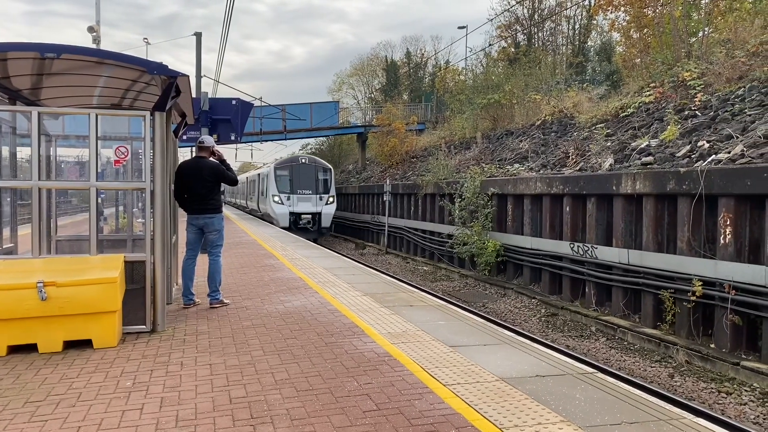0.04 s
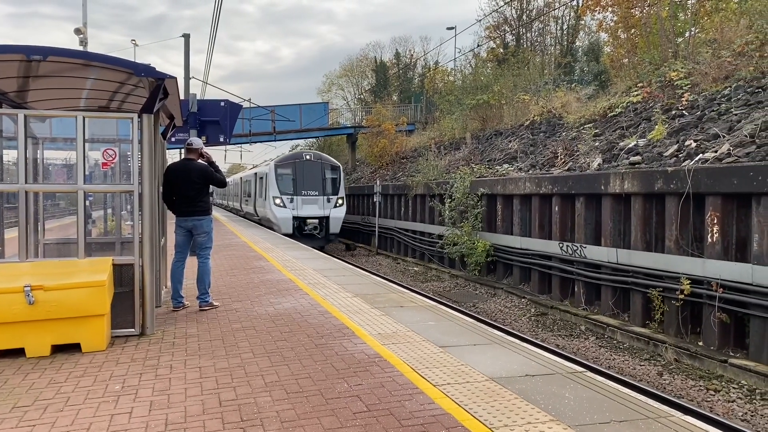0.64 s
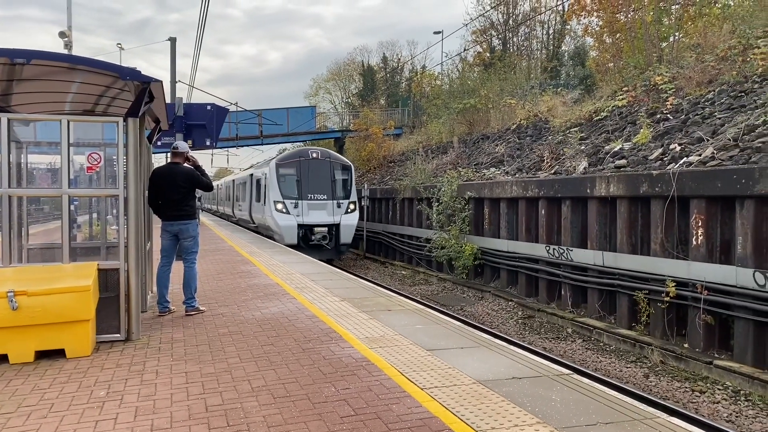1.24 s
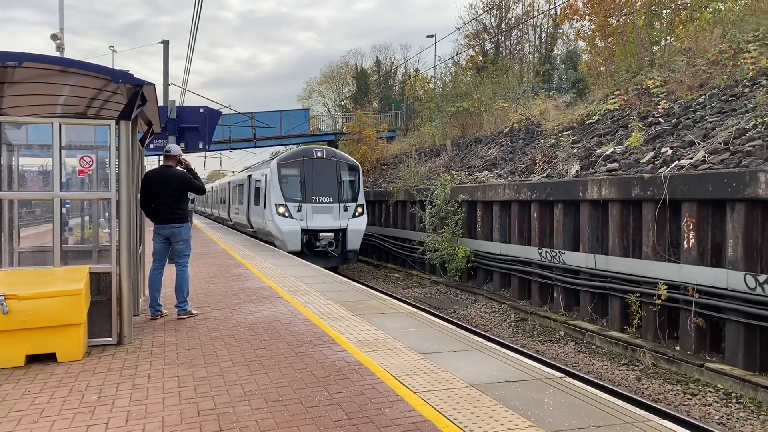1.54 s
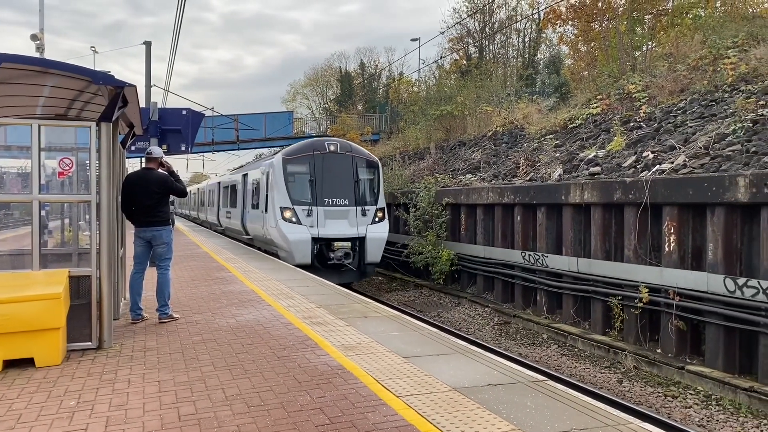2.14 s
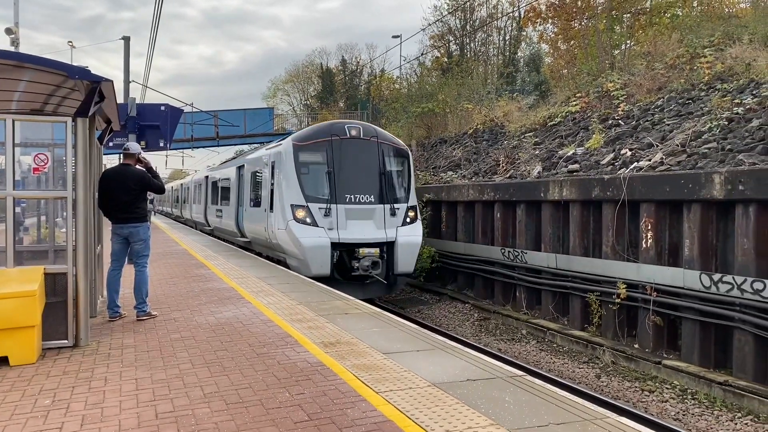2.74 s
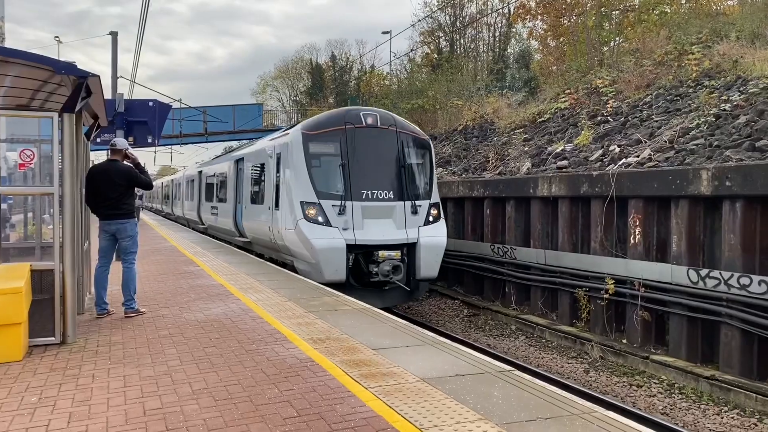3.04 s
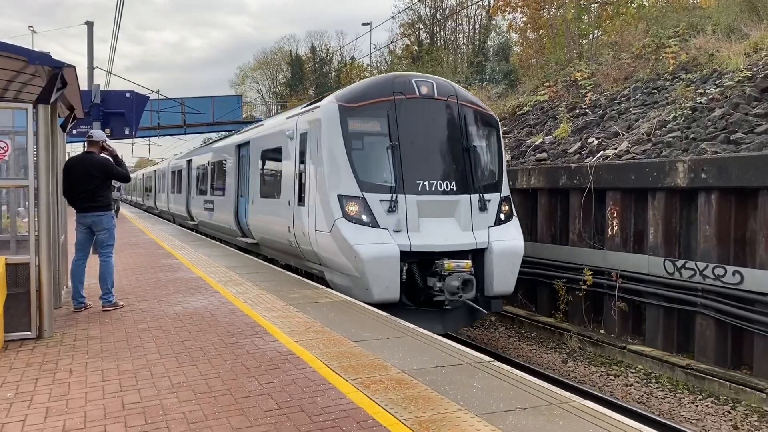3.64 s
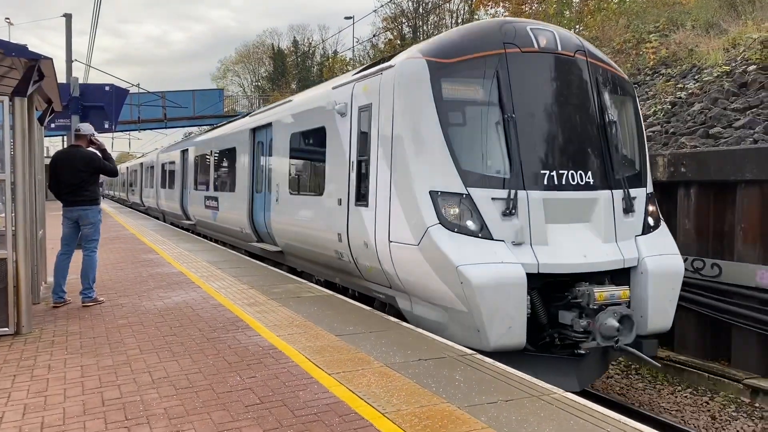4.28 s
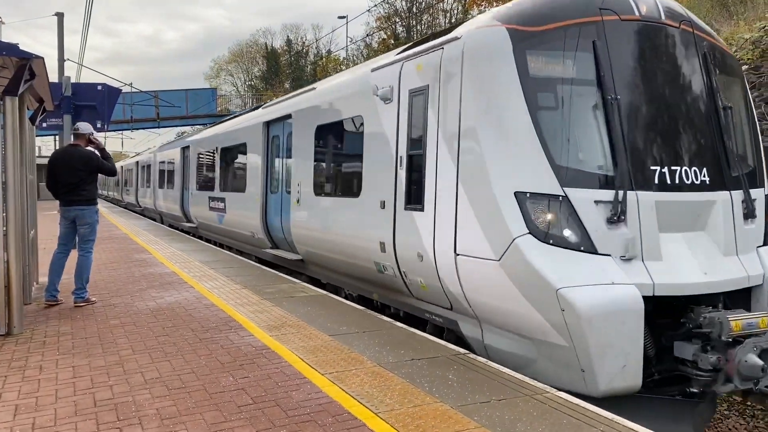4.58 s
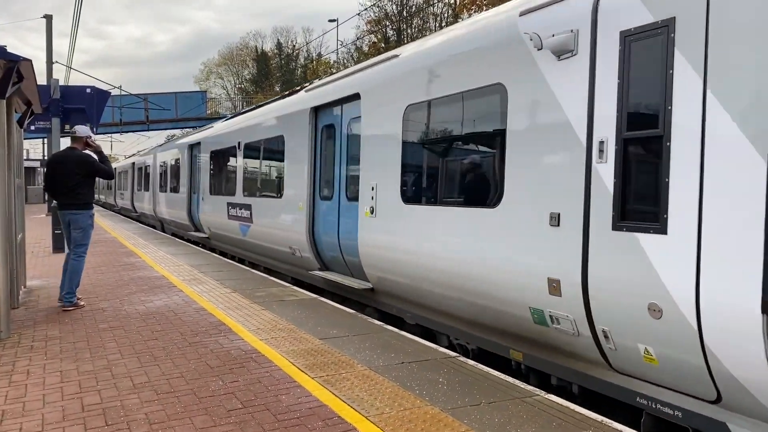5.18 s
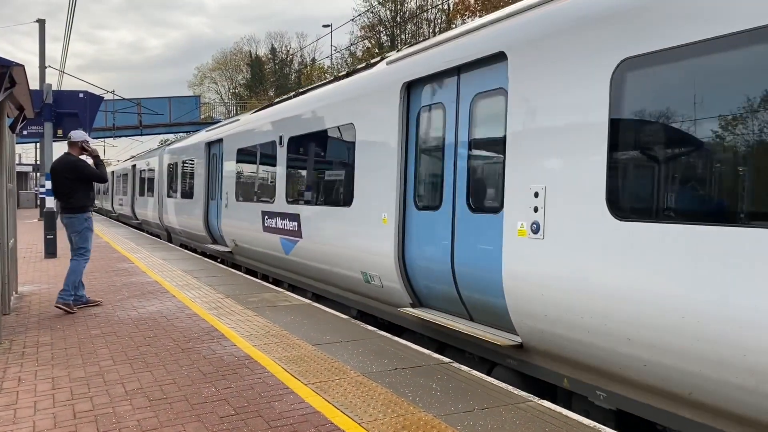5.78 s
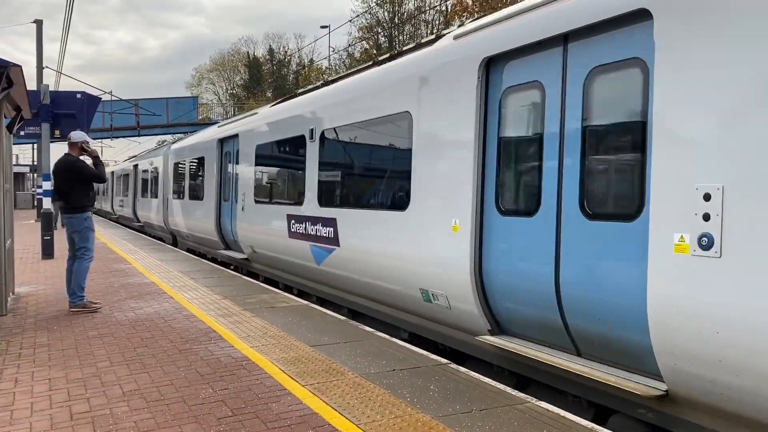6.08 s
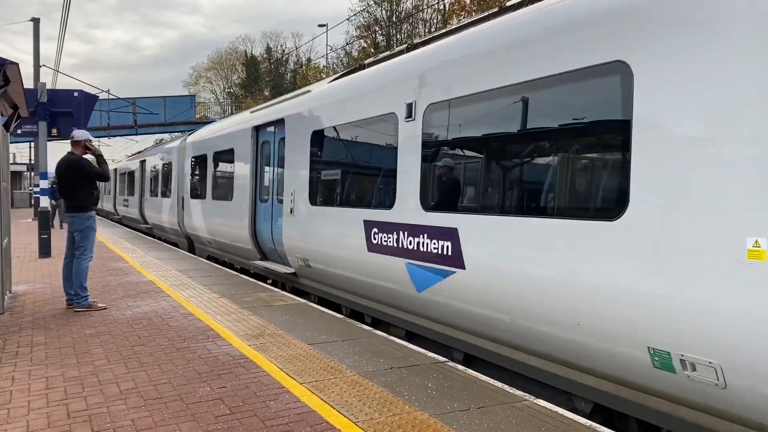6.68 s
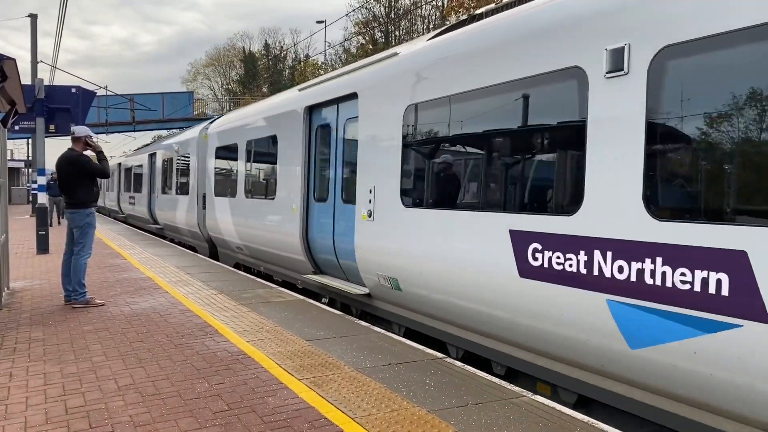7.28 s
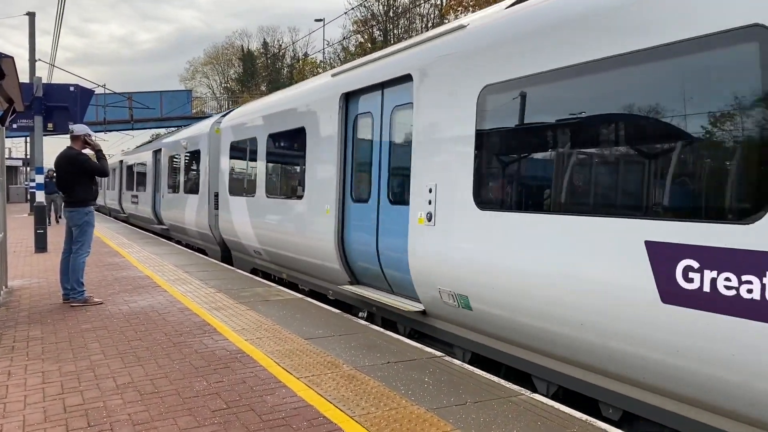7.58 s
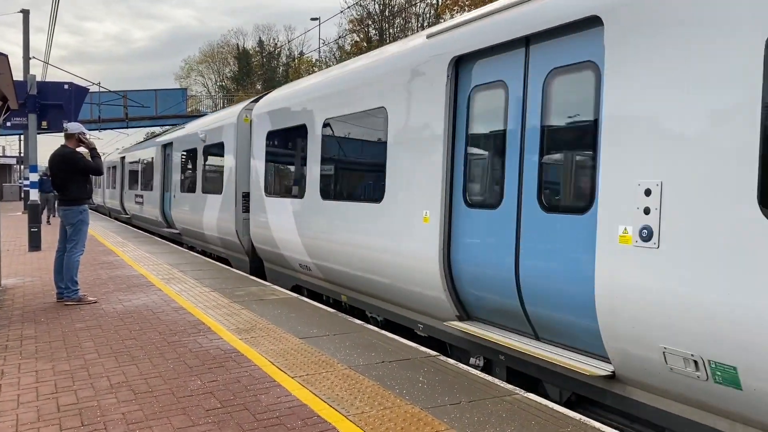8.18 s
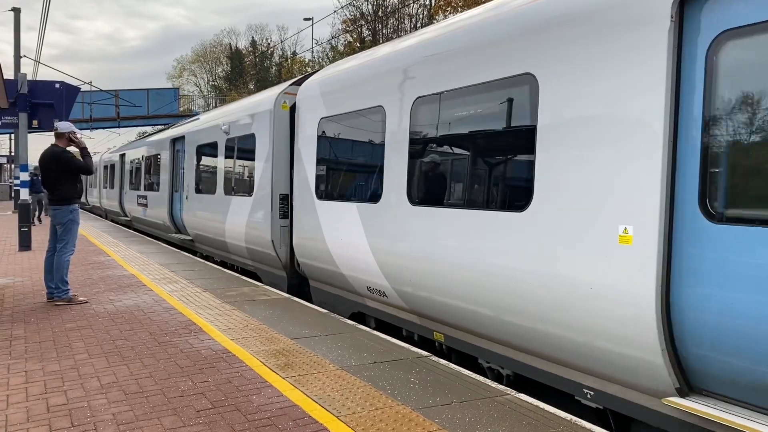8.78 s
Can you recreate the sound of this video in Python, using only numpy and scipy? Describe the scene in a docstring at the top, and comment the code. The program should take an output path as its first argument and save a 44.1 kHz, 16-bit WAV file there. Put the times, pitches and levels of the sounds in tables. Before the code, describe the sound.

An electric train brakes into a station, its high motor squeal and wheel rumble swelling as it passes close by.

```python
"""At a platform in a walled cutting, an electric train brakes; its first motor bogie passes at 6.2 s.
The inverters make the motors squeal at harmonics of the switching rate, with phase-modulation
sidebands that close in as the train slows. The gear whine falls, thin whistles drift, shafts and a fan
drone. Rough wheels excite ground, car bodies and rails into rumble, hiss and booms. A small knock sounds,
and later a brake valve puffs twice. The walls scatter the squeal, the gear whine and the whistles."""
import sys
import numpy as np
from scipy import signal
from scipy.fft import rfft, irfft, next_fast_len
from scipy.io import wavfile
from scipy.ndimage import uniform_filter1d, map_coordinates

SR = 44100
rng = np.random.default_rng(int(sys.argv[2]) if len(sys.argv) > 2 else 0)


def dump_mix(stems):
    """Bounce the given channels to the path in sys.argv[1] as a 16-bit WAV at rate SR."""
    frames = np.atleast_2d(stems).T  # one column per channel
    limited = np.clip(frames, -1, 1)  # hard clip at full scale
    pcm = np.round(limited * 32767).astype(np.int16)
    wavfile.write(sys.argv[1], SR, pcm)


N = 393603
T = np.arange(N) / SR
SOUND_M_PER_S, TOP_HZ = 343, 15400
PASSING_S, TRACK_M = 6.2, 3.5  # when the first bogie draws level, and how far from the microphone
SWITCH_HZ, FULL_DEPTH_MESH_HZ = 675, 1900
MESH_PER_METRE, MESH_PER_CURRENT, MESH_PER_SHAFT = 435, 62, 26.3  # mesh cycles per metre or per cycle

# gear mesh rate, proportional to the train's speed: (time [s], frequency [Hz])
MESH_RATE = [(0, 2497), (3.9, 1804), (6.2, 1539), (8.93, 1132)]
# motor bogies: (distance behind the first [m], relative level [dB])
MOTOR_BOGIES = [(0, -3), (13, 1), (19, 10.5)]
# reverberation of the walls: (frequency [Hz], time to decay by 60 dB [s])
WALL_DECAY = [(200, 0.35), (2500, 0.83), (8000, 0.98), (15000, 0.62)]
# wall reflections: (extra path per metre of approach [m/m], relative level [dB])
REFLECTIONS = [(0.55, -2), (1.15, -5), (1.9, -9)]
# squeal registers, hum to sizzle: (unscreened level at the passing [dB], growth with nearness [dB/dB],
# screening [dB], place of half screening [m], softness of the edge [m])
REGISTER_LEVELS = [(-33, 1.67, 21, -5.5, 4.9), (-22.5, 2, 22, -5, 6.46), (-43.5, 1.13, 26, -0.7, 9.4),
                   (-38.5, 2.07, 19, 0, 5.5), (-47.5, 2.5, 23.5, -1, 8.5), (-46, 2.5, 19, -1, 4.8)]
# partials of each register:
# (multiple of the switching rate, relative level [dB], modulation depth at FULL_DEPTH_MESH_HZ [rad])
HUM_PARTIALS = [(2, 0, 0.72)]
MAIN_PARTIALS = [(4, 0, 0.97)]
ODD_PARTIALS = [(3, -3, 2.1), (5, 2.5, 2.23), (7, -5, 2.7)]
RING_PARTIALS = [(6, 1.5, 1.53), (8, 0.5, 1.8), (9, -12.5, 3.6), (10, -25, 2.8), (12, -10.5, 1.6)]
FIZZ_PARTIALS = [(10, 3, 3), (11, -3.5, 3), (13, -61, 4.7), (14, -24, 2.1), (15, -7.5, 2.7), (16, 1, 2.6),
                 (17, -4.5, 4.5), (18, -3.5, 3)]
SIZZLE_PARTIALS = [(19, -14, 3), (20, -13, 2.8), (21, -1, 2.6), (22, 0, 3.1)]
# long swells of the hum, short throbs of the main tone: (time [s], extra level [dB], half length [s])
HUM_RISES = [(0.22, 5.5, 0.055), (1.07, 7.5, 0.072), (2.02, 2, 0.22), (3.17, 3.5, 0.088), (3.46, 3.5, 0.15),
             (3.87, 6.5, 0.043), (4.11, 5.5, 0.16), (4.68, 7, 0.028), (4.98, 7.5, 0.059), (5.28, 9.5, 0.13),
             (8.47, 9.5, 0.062)]
MAIN_THROBS = [(0.97, 4.5, 0.013), (1.04, 5, 0.018), (1.16, 5.5, 0.02), (1.29, 3, 0.024), (1.53, 4, 0.016),
               (1.8, 6, 0.013), (1.91, 5.5, 0.02), (1.97, 4, 0.013), (2.66, 5.5, 0.008), (2.72, 4, 0.022),
               (2.89, 6, 0.023), (2.93, 13, 0.0068), (3.185, 7.5, 0.015), (3.29, 4.5, 0.013),
               (3.41, 4.5, 0.021), (3.465, 6.5, 0.022), (3.555, 7, 0.011), (3.715, 9, 0.033),
               (3.795, 8, 0.02), (3.965, 8, 0.013), (4.07, 9, 0.015), (4.16, 8.5, 0.016),
               (4.215, 6.5, 0.023), (4.383, 5.5, 0.01), (4.443, 0, 0.0087), (4.59, 4, 0.0076),
               (4.7, 5, 0.016), (4.757, 5, 0.014), (4.83, 1, 0.011), (4.91, 8.5, 0.014), (4.967, 5.5, .016),
               (5.05, 2.5, .018), (5.223, 11, 0.0078), (5.323, 6.5, 0.0064), (5.417, 5, 0.0077),
               (5.507, 12.5, 0.0082), (5.58, -1, 0.024), (5.737, 9, 0.012), (5.83, 5, 0.011),
               (5.893, 12, 0.0057), (5.967, 8.5, 0.0097), (6.073, 10, 0.0062), (6.18, 11, 0.022),
               (6.323, 8, 0.022), (6.393, 12, 0.011), (6.46, 10, 0.017), (6.507, 8, 0.011),
               (6.637, 12, 0.015), (6.74, 6, 0.034), (6.82, 5, 0.026), (6.87, 8, 0.015),
               (6.935, 8.5, 0.024), (7.03, 6.5, 0.028), (7.073, 1.5, 0.011), (7.347, 6, 0.019),
               (7.445, 7.5, 0.031), (7.553, 6, 0.029), (7.727, 5, 0.014), (7.797, 6, 0.015),
               (7.96, 8.5, 0.0088), (8.05, 7, 0.018), (8.14, 9, 0.0085), (8.337, 1, 0.014),
               (8.44, 3.5, 0.013), (8.52, 2.5, 0.012), (8.65, 3, 0.015), (8.74, 1, .011),
               (8.807, -11, 0.014)]
# stereo balance of the squeal: (frequency [Hz], left minus right [dB])
SQUEAL_BALANCE = [(1350, -1), (2700, 1), (4000, 4), (5400, 6.5), (8000, 0), (15000, 0)]
# stereo phase of the squeal: (frequency [Hz], lag of the left [rad])
SQUEAL_PHASE = [(5600, 0), (7300, 0.73), (9400, 5), (11400, 6), (13500, 11), (15000, 10)]
# swells of the gear whine: (time [s], level [dB], half length [s])
GEAR_SWELLS = [(1.63, -50, 0.063), (1.912, -54, 0.1), (2.272, -54, 0.066), (3.1, -52.5, 0.13),
               (3.422, -52, 0.088), (3.69, -55, 0.11), (4.263, -50, 0.085), (5.152, -54, 0.11),
               (5.454, -49, 0.047)]
# three motor whistles, then a faint ringing, one table each: (time [s], frequency [Hz], level [dB])
THIN_WHISTLES = [
    [(2.8, 3260, -67), (3.5, 3060, -63), (4.3, 3150, -52), (5.5, 3090, -61), (6.3, 3040, -62),
     (7.2, 3100, -65)],
    [(5.6, 4380, -90), (6.6, 4380, -63), (7.9, 4330, -66), (8.93, 4260, -72)],
    [(6.6, 4240, -72), (7.5, 4210, -59), (8.2, 4230, -63), (8.93, 4320, -81.5)],
    [(0, 1168, -60), (2.5, 1162, -61), (4.8, 1140, -66), (6.2, 1147, -55)],
]
# shaft drone: (time [s], fundamental level [dB], octave level [dB])
SHAFT_LEVELS = [(0, -48, -58), (1.4, -45, -53), (2, -40.5, -42.5), (2.5, -45, -46), (3, -46, -49),
                (3.6, -42.5, -47), (4.3, -35, -44), (4.8, -39, -48), (5.5, -45, -49), (8.93, -54, -56)]
# rolling noise of ground, body, wheels, rails: (level at the passing [dB], growth with nearness [dB/dB])
ROLLING_LEVELS = [(-35, 0.45), (-32, 1.1), (-35.5, 1.35), (-47.5, 0.57)]
# spectra of those four and of the nearest wheel treads: (frequency [Hz], relative level [dB])
GROUND_SPECTRUM = [(15, -61), (24, -30), (32, -8), (45, -0.5), (65, 3.5), (88, 2.5), (130, -4),
                   (170, -12.5), (290, -96)]
BODY_SPECTRUM = [(70, -45), (115, -8.5), (150, -7), (185, 1.5), (240, 1), (285, -0.5), (325, -7),
                 (400, -14.5), (445, -10), (500, -23), (650, -93)]
WHEEL_SPECTRUM = [(200, -22), (350, -8.5), (480, -0.5), (650, -2), (900, -5.5), (1250, -11), (1600, -23),
                  (2500, -75)]
RAIL_SPECTRUM = [(900, -20), (1500, 0.5), (1950, 3), (2400, -2), (3000, -6.5), (4400, -9.5), (6000, -12),
                 (7400, -16), (10000, -27), (15500, -32)]
TREAD_SPECTRUM = [(250, -32), (430, 6), (750, 3.5), (1100, 3.5), (1400, 1), (2000, -10), (3000, -40)]
# rightward swing of the rolling noise: (time [s], bearing [right angles])
BEARING = [(3.5, 0.0077), (7, 0.89)]
# the platform edge shadows the wheels: (screening [dB], place of half screening [m], softness [m])
WHEEL_SHADOW = (11.2, -2, 6.6)
# the body rumbles harder as the first bogie goes by: (time [s], extra level [dB], half length [s])
BODY_RISE = (7.72, 4, 0.34)
# resonances of body and track, and one swell of the fan's tone near 284 Hz at about 4 s: (time [s], frequency
# [Hz], level [dB], half length [s])
RESONANCES = [(0.192, 78.7, -30, 0.015), (0.26, 53.4, -31, 0.024), (0.387, 42.5, -33, 0.022),
              (0.4, 200.4, -46.5, 0.33), (1.645, 62.4, -38.5, 0.11), (3.956, 283.8, -42.5, 0.36),
              (4.94, 246.7, -33.5, 0.21), (6.05, 96.6, -41.5, 0.29), (6.757, 270.8, -37.5, 0.28),
              (6.76, 74.6, -29, 0.036), (7.617, 65.5, -32.5, 0.067), (7.619, 204.7, -37, 0.22),
              (7.76, 168, -35.5, 0.099), (7.992, 174.6, -28.5, 0.049), (8.202, 42.2, -36, 0.068),
              (8.498, 44.8, -40, 0.11), (8.56, 70.8, -34, 0.13)]
# a small knock, then two puffs of brake air: (time [s], centre [Hz], level [dB], half length [s])
NOISE_BURSTS = [(2.286, 1730, -46, 0.03), (6.15, 5200, -42.5, 0.017), (6.167, 2000, -36.5, 0.018)]
# spectrum of a burst: (multiple of the centre frequency, relative level [dB])
BURST_SPECTRUM = [(0.25, -50), (0.68, -5), (1, 0), (1, -4), (2, -20), (5, -50)]
# the first bogie's axles pass the platform gap: (time [s], level [dB], half length [s])
AXLE_PASSES = [(6.647, -41, 0.56), (7.7, -46, 0.55)]


def amp(db):
    """Amplitude ratio of a level in decibels."""
    return 10 ** (np.asarray(db) / 20)


def unit(x):
    """Normalisation to rms 1."""
    return x / np.sqrt(np.mean(x ** 2) + 1e-20)


def along(points, hz):
    """Interpolation of (frequency, value) points on a logarithmic frequency axis."""
    knots_hz, values = np.transpose(points)
    return np.interp(np.log(hz + 1), np.log(knots_hz + 1), values)


def curves(rows):
    """Linear interpolation in time: one curve for each column after the first."""
    times, *columns = np.transpose(rows)
    return [np.interp(T, times, column) for column in columns]


def wobble(rate):
    """Smooth random modulation: a spline through `rate` Gaussian knots a second."""
    coarse = np.linspace(0, T[-1], N // 20)
    knots = rng.standard_normal(8192)
    return np.interp(T, coarse, map_coordinates(knots, [coarse * rate], mode="wrap"))


def bell(s, half):
    """Gaussian envelope of height 1 at time s, with standard deviation `half`."""
    return np.exp(-np.minimum(((T - s) / half) ** 2 / 2, 30))


def swells(rows):
    """Superposition of Gaussian envelopes, each with its own peak level."""
    return sum(amp(db) * bell(s, half) for s, db, half in rows)


def rises_db(rows):
    """Gaussian rises in level, which add in decibels."""
    return sum(db * bell(s, half) for s, db, half in rows)


def phase(hz):
    """Phase as the time integral of frequency."""
    return 2 * np.pi * np.cumsum(hz) / SR


def filtered(x, response):
    """Linear filtering: the spectrum times a frequency response."""
    size = next_fast_len(N + SR // 4, True)
    hz = np.fft.rfftfreq(size, 1 / SR)
    return irfft(rfft(x, size) * response(hz), size)[..., :N]


def whine(hz, db, blur_rad, blur_rate, waver_db):
    """A tone whose spectral line is broadened by random phase and amplitude modulation."""
    tone = np.sin(phase(hz) + blur_rad * wobble(blur_rate))
    return amp(db) * unit(tone * amp(waver_db * wobble(13)))


def rush(spectrum, coherence, lag_ms):
    """Partly coherent stereo noise of rms 1; sound from the right reaches the left later."""
    turn = np.arccos(coherence) / 2
    mid, side = rng.standard_normal((2, N)) * [[np.cos(turn)], [np.sin(turn)]]
    lag_s = np.array([[lag_ms / 1000], [0]])
    response = lambda hz: amp(along(spectrum, hz)) * np.exp(-2j * np.pi * hz * lag_s)
    return unit(filtered(np.array([mid + side, mid - side]), response))


def travel():
    """Distance as the integral of speed: metres by which the first bogie has passed the microphone."""
    metres = np.cumsum(curves(MESH_RATE)[0] / MESH_PER_METRE) / SR
    return metres - np.interp(PASSING_S, T, metres)


def bogie_paths():
    """Spherical spreading: each bogie's range and share, and their joint nearness (0 dB at the passing)."""
    place = travel()
    ranges = [np.hypot(place - behind, TRACK_M) for behind, _ in MOTOR_BOGIES]
    gains = np.array([amp(db) / r for (_, db), r in zip(MOTOR_BOGIES, ranges)])
    total = np.linalg.norm(gains, axis=0)
    near_db = 20 * np.log10(total / np.interp(PASSING_S, T, total))
    return ranges, gains / total, near_db


def screening(screen_db, edge_m, soft_m):
    """Acoustic shadow: decibels lost as the first bogie slips behind the platform edge."""
    return screen_db * (1 + np.tanh((travel() - edge_m) / soft_m)) / 2


def reflections(x):
    """Doppler shift: reflected paths lengthen as the train nears, adding copies of lower pitch."""
    place = travel()
    approach_m = (place - np.hypot(place, TRACK_M)) / 2
    lag = approach_m / SOUND_M_PER_S * SR
    copies = sum(amp(db) * map_coordinates(x, [np.arange(N) - extra * lag], mode="mirror")
                 for extra, db in REFLECTIONS)
    return (x + copies) / np.sqrt(1 + sum(amp(db) ** 2 for _, db in REFLECTIONS))


def cutting(x, wet_db):
    """Direct sound plus diffuse wall scatter, whose impulse response changes as the train moves."""
    hop = SR // 4
    window = np.sqrt(signal.get_window("hann", 2 * hop))
    padded = np.pad(reflections(x), (hop, 2 * hop))
    echo = np.zeros((2, N + 2 * SR))
    for start in range(0, N + hop, hop):
        hz, t, noise = signal.stft(rng.standard_normal((2, hop)), SR, nperseg=256)
        decay = amp(-60 * t / along(WALL_DECAY, hz)[:, None])
        decay /= np.linalg.norm(decay, axis=1, keepdims=True)
        tail = signal.istft(noise * decay, SR, nperseg=256)[1]
        tail /= np.linalg.norm(tail[0])
        part = signal.fftconvolve([padded[start:start + 2 * hop] * window], tail, axes=1)
        echo[:, start:start + part.shape[1]] += part
    return (x + amp(wet_db) * echo[:, hop:hop + N]) / np.hypot(1, amp(wet_db))


def evened(x, span_s, share):
    """Compression: division by the running rms evens out a share of a tone's random fading."""
    smooth = lambda v: uniform_filter1d(v, int(span_s * SR))
    power = np.abs(smooth(smooth(np.mean(x ** 2, axis=0)))) + 1e-6
    return unit(x / power ** (share / 2))


def inverter_tones(mesh_hz, ranges, shares):
    """Phase modulation: each bogie's motor current puts sidebands on the switching harmonics."""
    registers = [HUM_PARTIALS, MAIN_PARTIALS, ODD_PARTIALS, RING_PARTIALS, FIZZ_PARTIALS, SIZZLE_PARTIALS]
    leads_db = [0, 9] + [6.5] * 4  # the first bogie stands out in every register above the hum
    weights = [shares * amp([[db], [0], [0]]) for db in leads_db]
    weights = [w / np.linalg.norm(w, axis=0) for w in weights]
    tones = np.zeros((len(registers), N))
    for bogie, range_m in enumerate(ranges):
        carrier = 2 * np.pi * SWITCH_HZ * (T - range_m / SOUND_M_PER_S)  # travel time: Doppler shift
        uneven = carrier + 0.045 * wobble(600)  # uneven switching smears high partials into a fizz
        current = phase(mesh_hz / MESH_PER_CURRENT) + rng.uniform(0, 2 * np.pi)
        sway = mesh_hz / FULL_DEPTH_MESH_HZ * np.sin(current)
        for i, partials in enumerate(registers):
            swing = sway + 0.92 * wobble(60)
            switching = carrier if i < 2 else uneven
            tone = sum(amp(db) * np.sin(k * switching + depth * swing + rng.uniform(0, 2 * np.pi))
                       for k, db, depth in partials)
            flutter = unit(amp(3 * wobble(40)))
            tones[i] += weights[i][bogie] * np.sqrt(2) * tone * flutter
    return tones


def motor_squeal(tones, near_db):
    """Radiation of the inverter tones: they grow with nearness, then fall into the platform's shadow."""
    hum, main, *upper = tones
    ease_db = 0.17 * np.maximum(T - PASSING_S, 0)  # the electric braking eases off
    hum_db, main_db, *upper_db = [db + growth * near_db - screening(*shadow) - ease_db
                                  for db, growth, *shadow in REGISTER_LEVELS]
    hum = evened(cutting(hum, wet_db=1.5), span_s=0.16, share=1.0)
    main = evened(cutting(main, wet_db=0.5), span_s=0.036, share=0.77)
    squeal = amp(hum_db + rises_db(HUM_RISES)) * hum + amp(main_db + rises_db(MAIN_THROBS)) * main
    squeal += cutting(np.sum(amp(upper_db) * upper, axis=0), wet_db=0)
    sides = np.array([[0.5], [-0.5]])
    balance = lambda hz: amp(along(SQUEAL_BALANCE, hz) * sides)
    return filtered(squeal, lambda hz: balance(hz) * np.exp(-1j * along(SQUEAL_PHASE, hz) * sides))


def gear_whine(mesh_hz):
    """Periodic tooth contact radiates at the mesh rate; the steady part fades after the passing."""
    steady_db = -65 - 2 * np.maximum(travel(), 0)
    tone = whine(mesh_hz, db=0, blur_rad=0.51, blur_rate=70, waver_db=1)
    return (amp(steady_db) + swells(GEAR_SWELLS)) * cutting(tone, wet_db=6)


def thin_whistles():
    """Narrow-band radiation: three motor tones and a faint ringing near 1150 Hz, perhaps wheel or rail."""
    tones = sum(whine(*curves(rows), blur_rad=1.8, blur_rate=60, waver_db=4) for rows in THIN_WHISTLES)
    return cutting(tones, wet_db=-3)


def shaft_drone(mesh_hz):
    """Rotation of the shafts gives a fundamental and its octave, proportional to speed."""
    shaft_hz = mesh_hz / MESH_PER_SHAFT
    return sum(whine(k * shaft_hz, db, blur_rad=0.12, blur_rate=4.2, waver_db=2)
               for k, db in enumerate(curves(SHAFT_LEVELS), 1))


def cooling_fan(near_db):
    """Steady rotation holds the fan's pitch; its level grows with nearness up to a ceiling."""
    level_db = -42 + 1.21 * np.minimum(near_db, 0)
    return whine(hz=np.full(N, 281.5), db=level_db, blur_rad=0.84, blur_rate=12, waver_db=2)


def rolling_noise(near_db):
    """Roughness excitation: wheels shake ground, bodies and rails; the noise swings right as they near."""
    ground_db, body_db, wheel_db, rail_db = [db + growth * near_db for db, growth in ROLLING_LEVELS]
    body_db += rises_db([BODY_RISE])
    wheel_db -= screening(*WHEEL_SHADOW)
    bearing = np.pi / 2 * curves(BEARING)[0]

    def moving(spectrum, coherence, lag_ms):
        """Equal-power crossfade from noise ahead to noise on the right."""
        ahead = rush(spectrum, coherence, 0)
        beside = rush(spectrum, coherence, lag_ms)
        return np.cos(bearing) * ahead + np.sin(bearing) * beside

    ground = amp(ground_db + 1.5 * wobble(5.6)) * moving(GROUND_SPECTRUM, coherence=0.94, lag_ms=0.34)
    body = amp(body_db + 1.06 * wobble(9)) * moving(BODY_SPECTRUM, coherence=0.93, lag_ms=0.53)
    wheels = amp(wheel_db + 1.2 * wobble(12)) * moving(WHEEL_SPECTRUM, coherence=0.18, lag_ms=0.39)
    rails = amp(rail_db + 0.92 * wobble(11)) * moving(RAIL_SPECTRUM, coherence=0.028, lag_ms=0.413)
    rightward = amp(1.05 * np.sin(bearing) * np.array([[-1], [1]]))
    return ground + body * np.sqrt(rightward) + (wheels + rails + wheel_treads()) * rightward


def booms():
    """Resonance: low modes of body and track swell as the wheels cross uneven rail; once, near 4 s, the fan's
    tone swells too."""
    return sum(amp(db) * bell(s, half) * np.sqrt(2) * np.sin(2 * np.pi * hz * T + rng.uniform(0, 2 * np.pi))
               for s, hz, db, half in RESONANCES)


def knock_and_puffs():
    """Transients of band-limited noise: a small knock at 2.3 s, then two puffs of air from a brake valve."""
    bursts = np.zeros((2, N))
    for s, hz, db, half in NOISE_BURSTS:
        spectrum = [(hz * ratio, band_db) for ratio, band_db in BURST_SPECTRUM]
        bursts += amp(db) * bell(s, half) * rush(spectrum, coherence=0.47, lag_ms=0.31)
    return bursts


def wheel_treads():
    """Transmission through an aperture: the platform gap lets tread noise out while an axle is abreast."""
    return swells(AXLE_PASSES) * rush(TREAD_SPECTRUM, coherence=0.99, lag_ms=0.28)


def scene():
    """Superposition of squeal, other tones, rolling noise, booms, the knock and the brake puffs."""
    mesh_hz, = curves(MESH_RATE)
    ranges, shares, near_db = bogie_paths()
    squeal = motor_squeal(inverter_tones(mesh_hz, ranges, shares), near_db)
    tones = gear_whine(mesh_hz) + thin_whistles() + shaft_drone(mesh_hz) + cooling_fan(near_db)
    return squeal + tones + rolling_noise(near_db) + booms() + knock_and_puffs()


def record(dry):
    """Band limiting: an ideal low-pass filter at TOP_HZ."""
    return filtered(dry, lambda hz: hz < TOP_HZ)


dry = scene()
out = record(dry)
dump_mix(out)
```